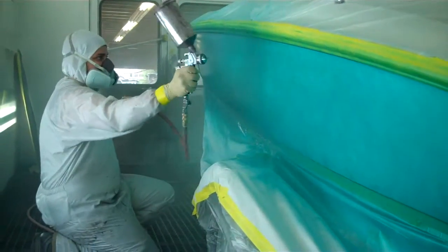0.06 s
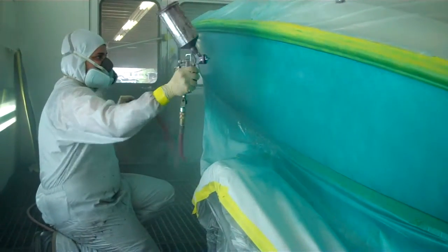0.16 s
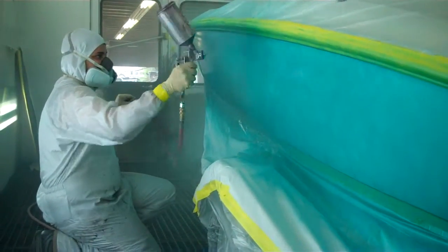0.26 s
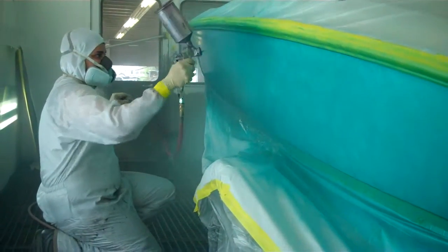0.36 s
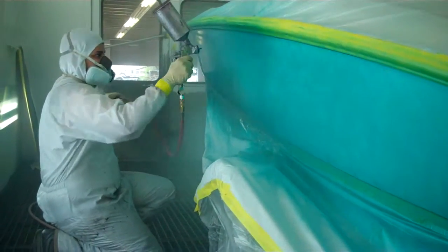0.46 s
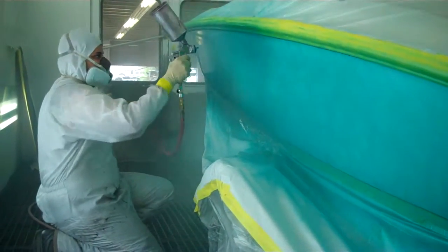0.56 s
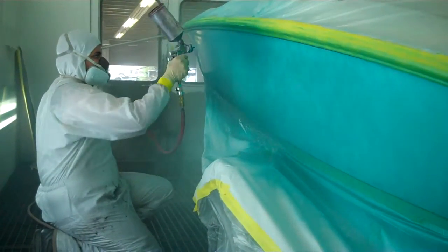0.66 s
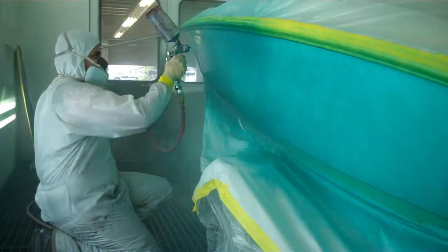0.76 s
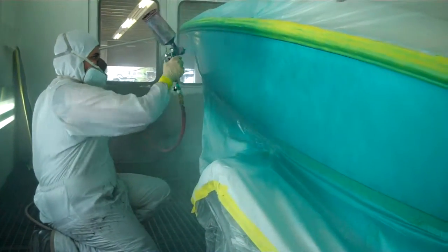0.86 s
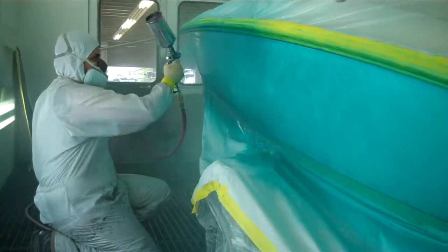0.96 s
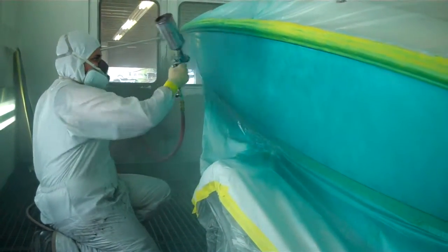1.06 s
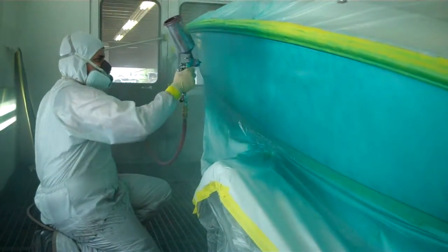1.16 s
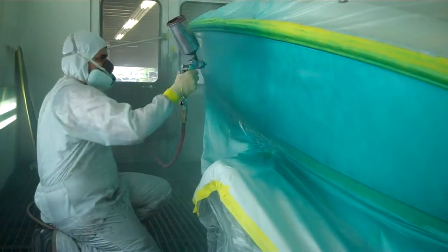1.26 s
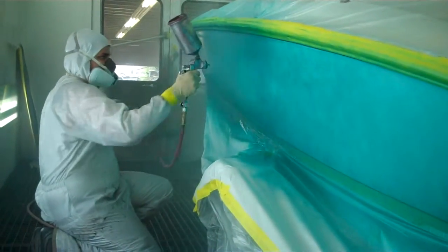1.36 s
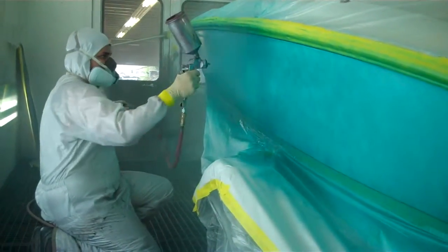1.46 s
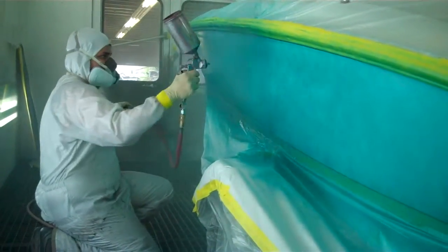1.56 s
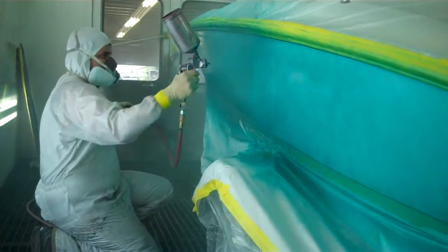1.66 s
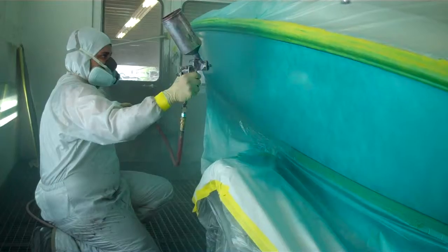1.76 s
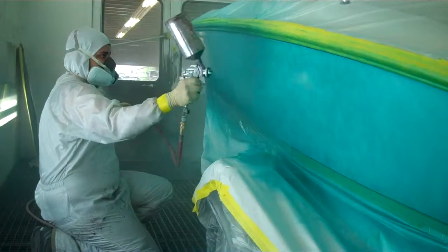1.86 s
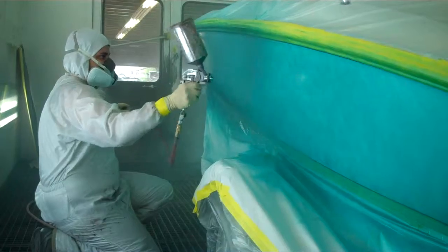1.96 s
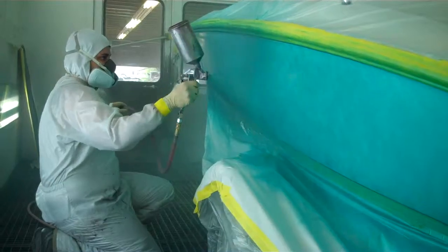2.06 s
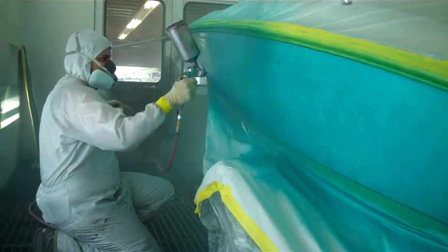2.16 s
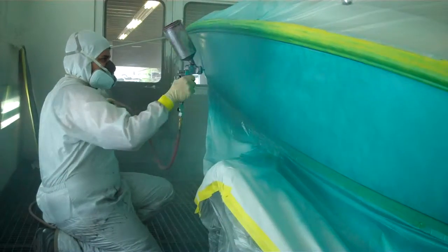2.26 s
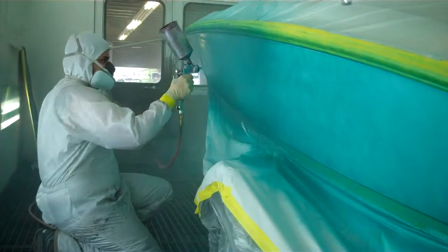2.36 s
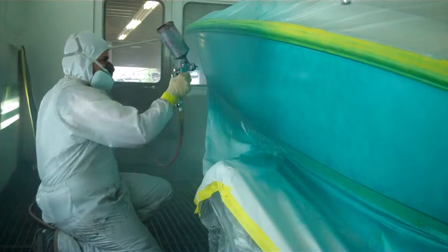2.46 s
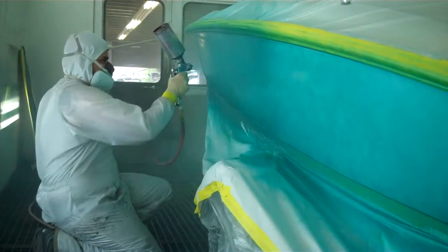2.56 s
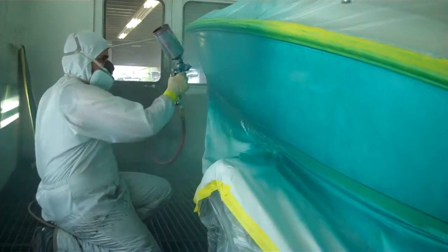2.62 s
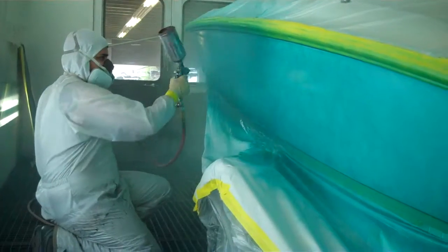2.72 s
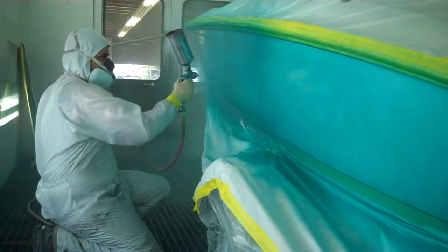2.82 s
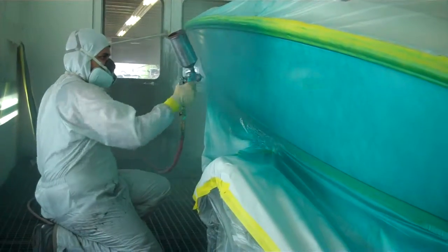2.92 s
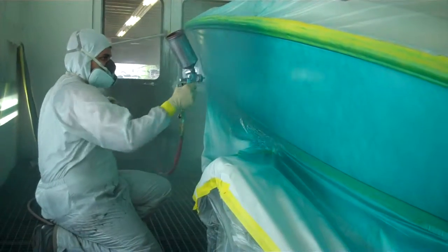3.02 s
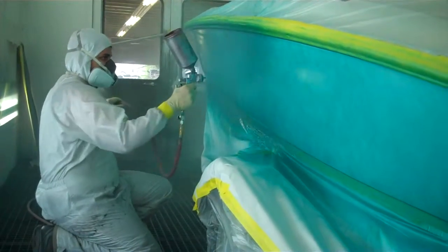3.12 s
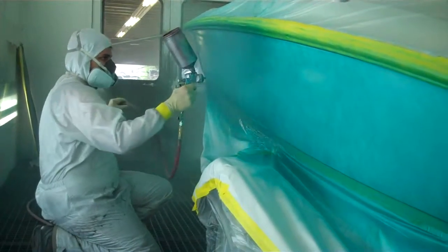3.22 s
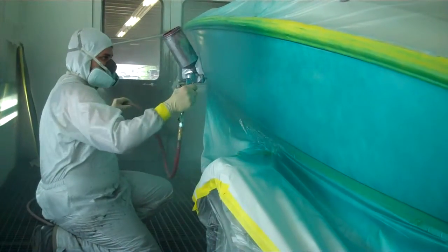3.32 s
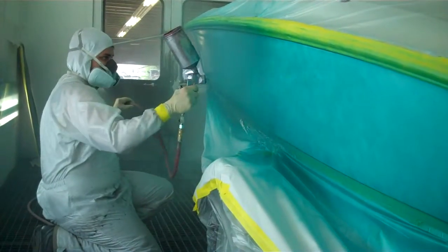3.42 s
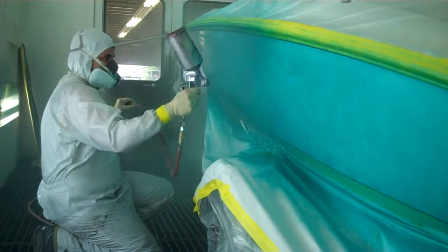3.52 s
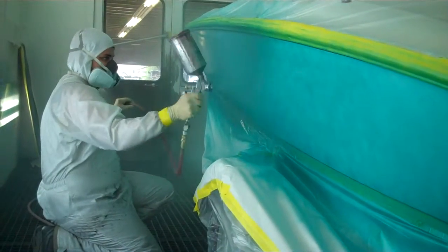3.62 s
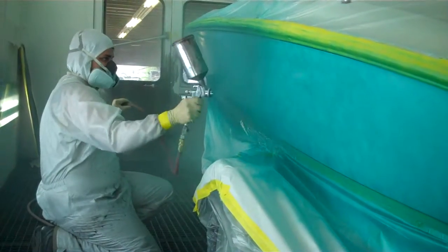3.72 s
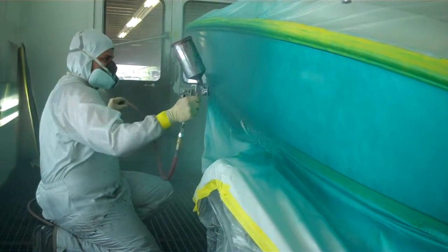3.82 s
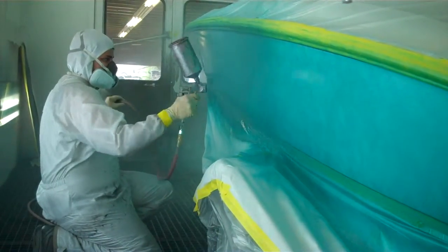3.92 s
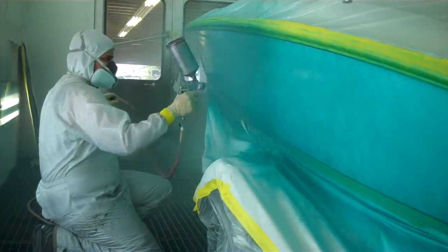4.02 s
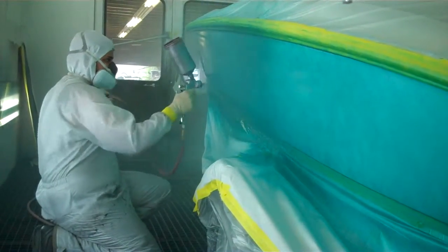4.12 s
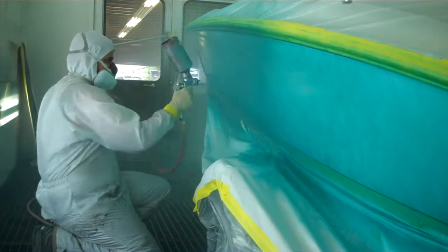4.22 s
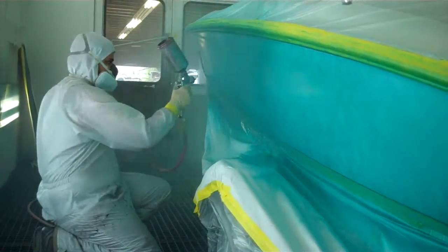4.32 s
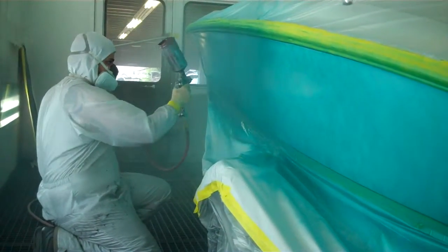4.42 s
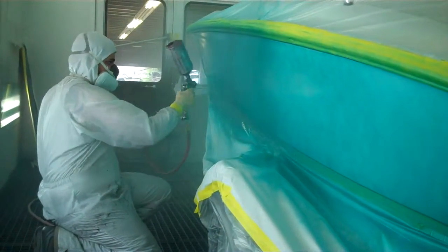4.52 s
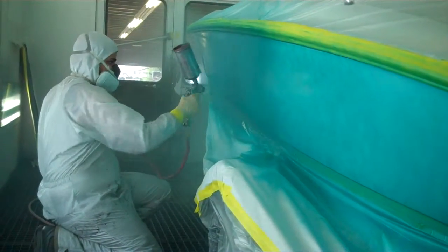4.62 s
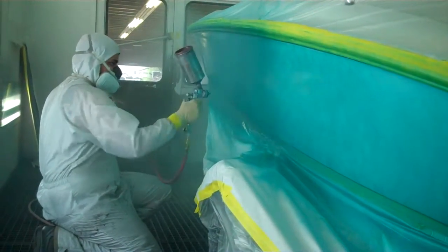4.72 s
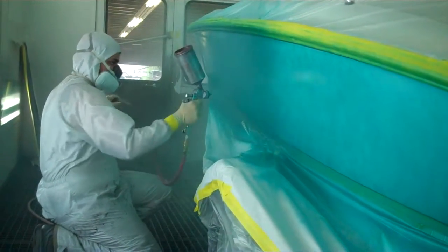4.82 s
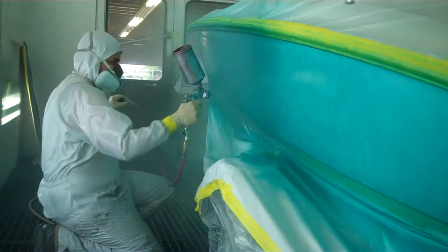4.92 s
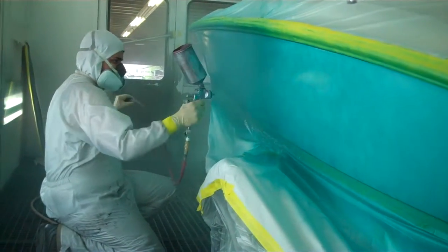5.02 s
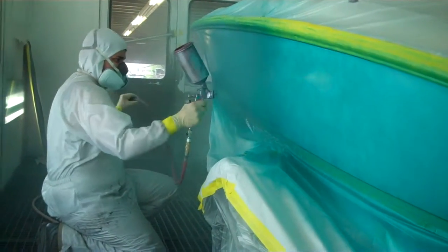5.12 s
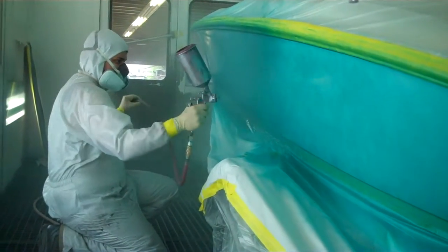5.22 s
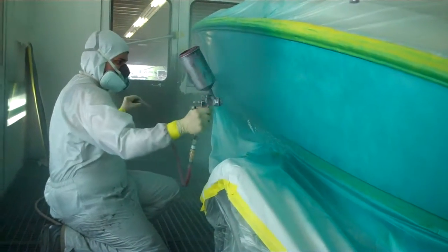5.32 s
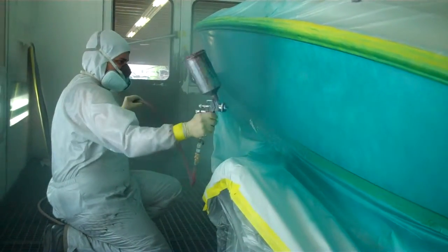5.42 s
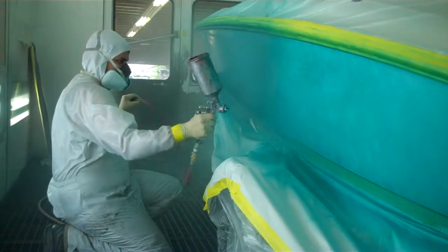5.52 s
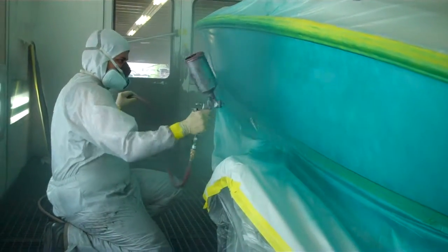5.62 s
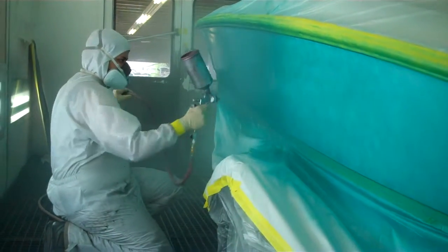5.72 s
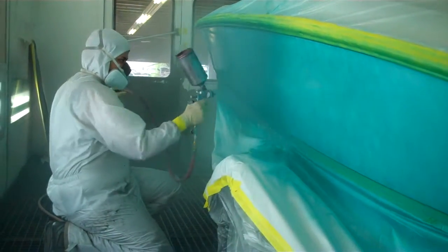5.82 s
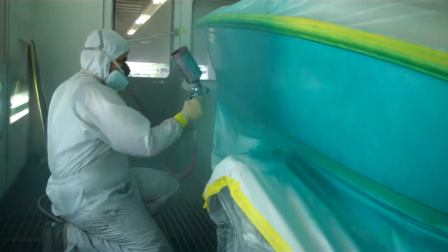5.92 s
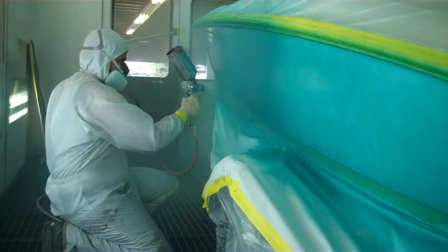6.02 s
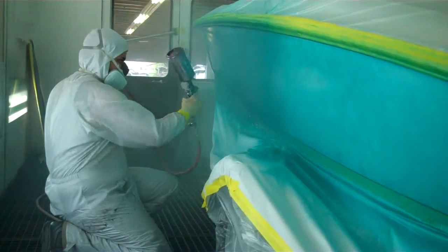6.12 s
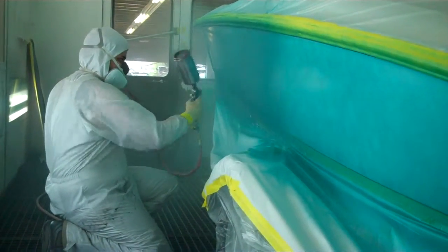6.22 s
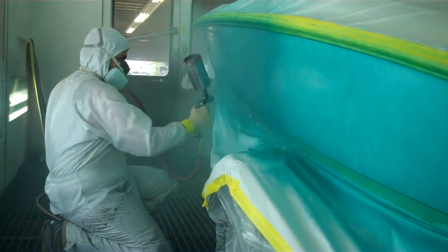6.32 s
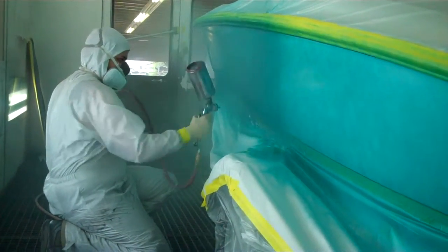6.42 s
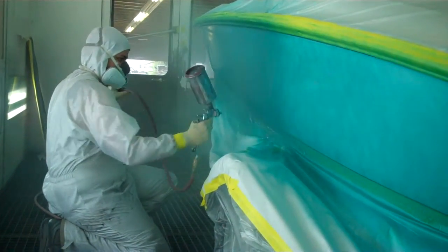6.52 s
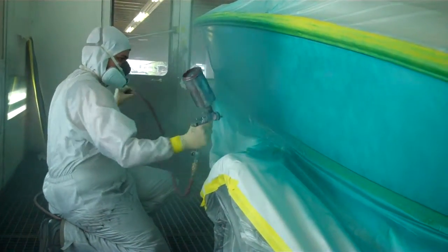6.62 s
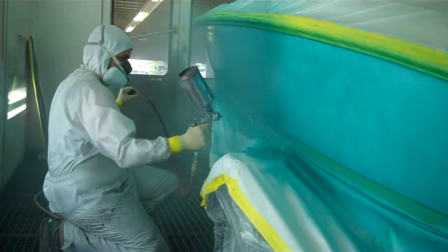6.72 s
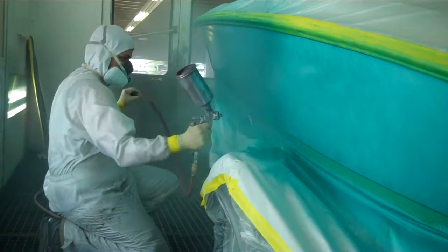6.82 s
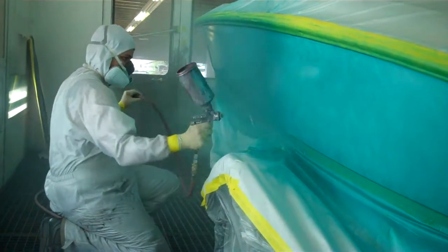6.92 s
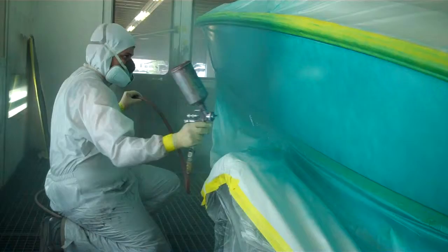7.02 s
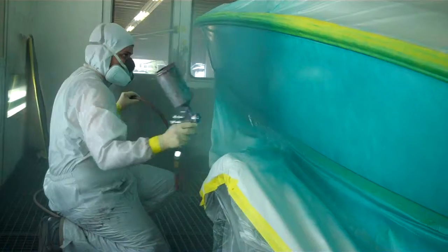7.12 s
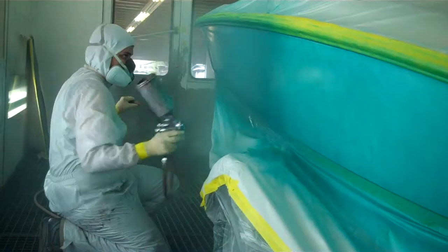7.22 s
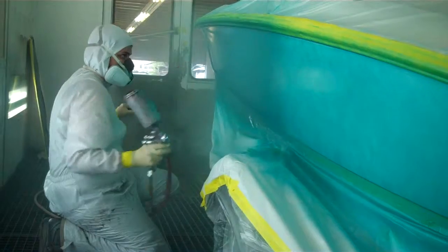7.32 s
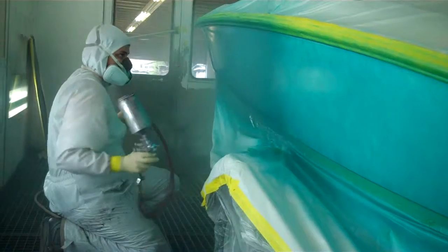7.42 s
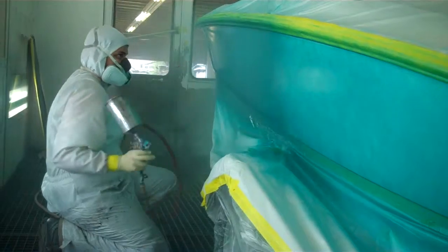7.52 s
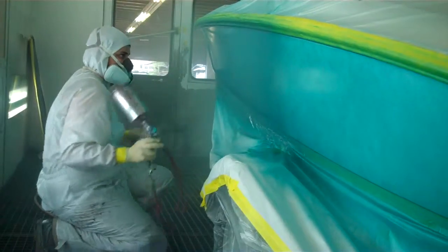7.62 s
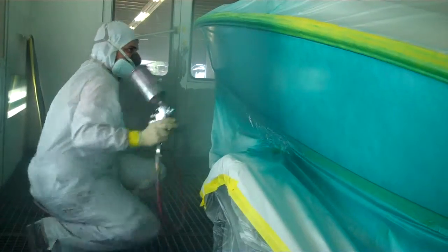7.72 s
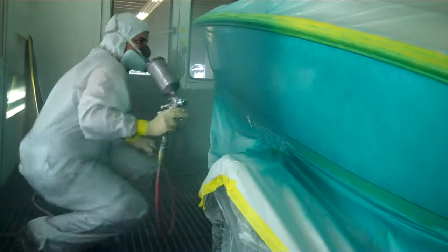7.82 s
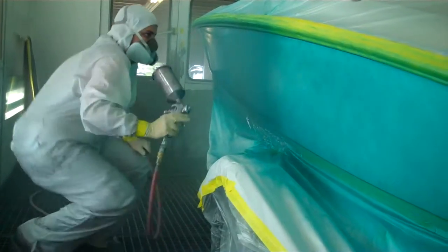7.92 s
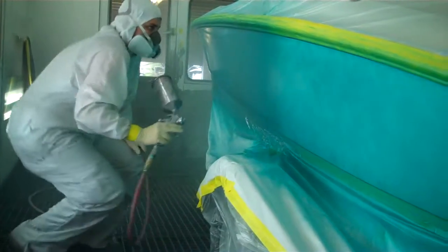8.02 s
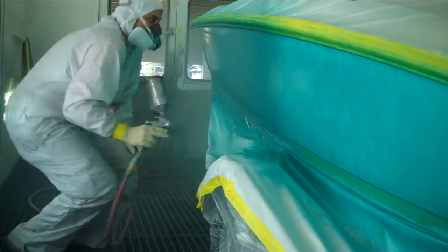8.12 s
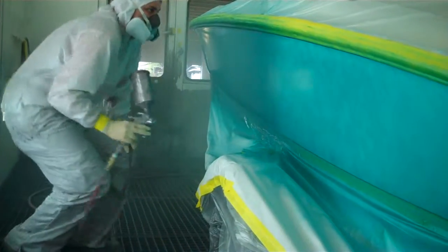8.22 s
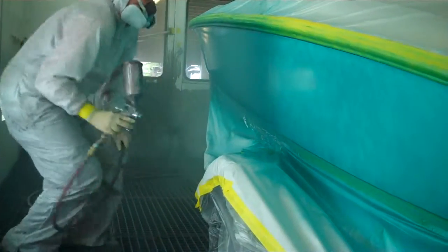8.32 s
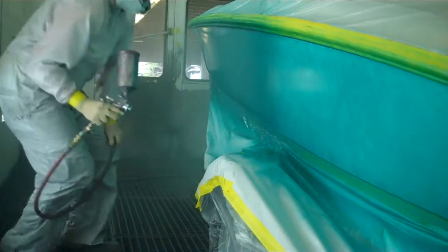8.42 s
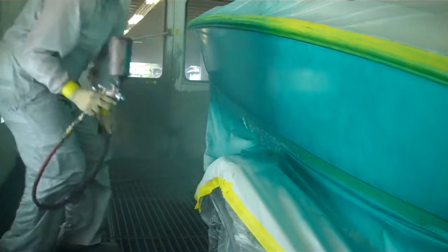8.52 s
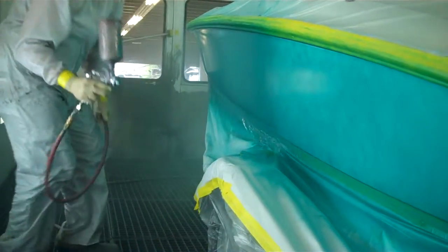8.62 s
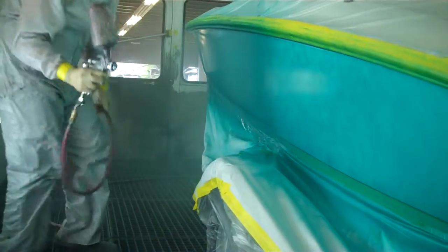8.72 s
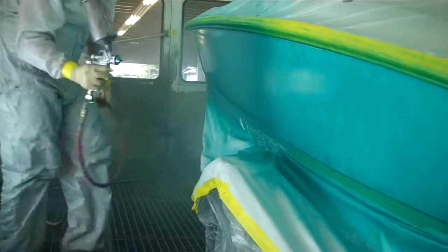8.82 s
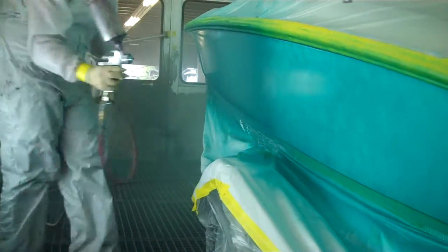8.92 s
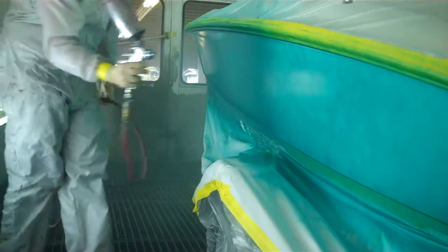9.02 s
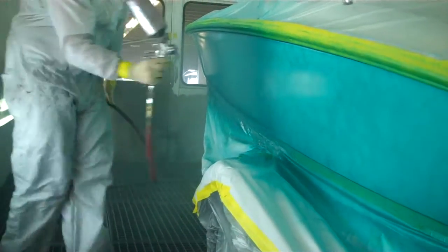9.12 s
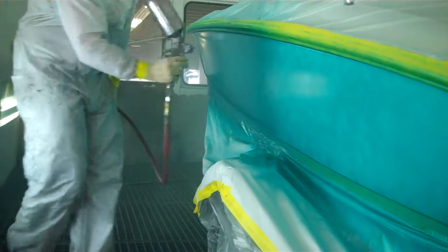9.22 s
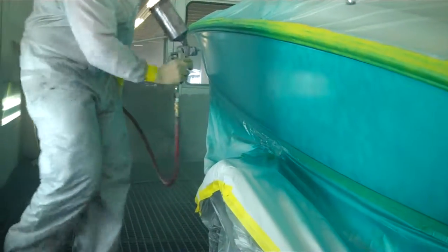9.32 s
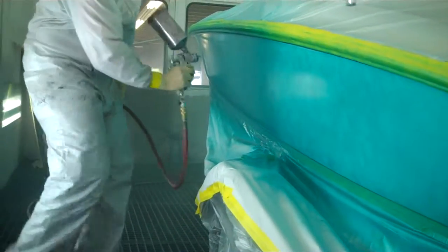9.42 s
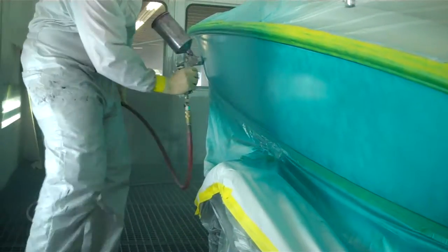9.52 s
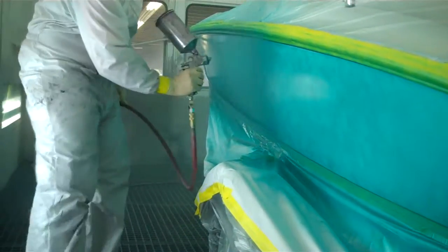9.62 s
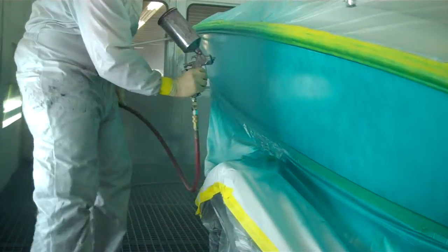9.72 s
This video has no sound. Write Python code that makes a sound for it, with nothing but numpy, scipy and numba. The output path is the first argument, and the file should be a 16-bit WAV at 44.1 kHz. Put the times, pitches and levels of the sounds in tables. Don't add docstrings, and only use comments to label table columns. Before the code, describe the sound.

A compressed-air spray gun hisses loudly in a humming booth, spits off, leaves a faint leak and rhythmic wheeze, then bursts back with crackles.

```python
import sys
import numpy as np
from scipy import signal
from scipy.fft import rfft, irfft
from scipy.io import wavfile
from scipy.ndimage import uniform_filter1d, map_coordinates
from numba import njit

SR = 44100
rng = np.random.default_rng(int(sys.argv[2]) if len(sys.argv) > 2 else 0)


def wav_record(signal):
    frames = np.transpose(np.atleast_2d(signal))
    bounded = np.clip(frames, -1, 1)
    quanta = np.round(bounded * 32767).astype(np.int16)
    wavfile.write(sys.argv[1], SR, quanta)


def makeup_ratio(level_db):
    decades = np.asarray(level_db, float) / 20
    return 10 ** decades


N = 430416
T = np.arange(N) / SR
F = np.fft.rfftfreq(N, 1 / SR) + 1

# sheet lobe, core lobe, body, top [f/Hz]
JET_BANDS_HZ = [5800, 7900, 2900, 13000]
# [f/Hz, density/dB per Hz, port likeness 0-1]
JET_COLOUR = [(250, -87, .9), (587, -73.5, 0.8), (870, -74, 0.86), (1640, -68.5, 0.72), (2440, -67.5, 0.74),
              (3380, -66, 0.38), (5700, -62.5, 0.48), (9050, -61, 0.6), (14500, -59.5, .1)]
# [t/s, nearness level/dB, sheet level/dB, core level/dB]
STROKES = [(0.0, 0.1, 1, 0.5), (0.25, -0.4, 1, 2), (0.62, -2.2, 0.5, -0.4), (0.95, 0, -0.5, -1.9),
           (1.38, 1.8, 1.5, -0.5), (1.78, -0.7, 1, 1), (2.3, -2, 0.5, 0.0), (2.62, -1, 3.5, 0.7),
           (2.86, 0.9, 0.1, -2), (3.0, 3, 2.0, -3), (3.5, 1, 0.7, 0.5), (4.05, -1.6, 2, 0),
           (4.4, 0, 1.5, -2.3), (4.9, 1.7, 2, -2.5), (5.45, 0.5, 0, 0.3), (5.85, -3, 4, 0.3),
           (6.4, 1.9, -0.5, -3), (7.17, 0.4, 0.5, 1.2)]
# [t/s, nearness level/dB, sheet level/dB, core level/dB]
RESUMED = [
    (8.88, -6.5, 2, 3),
    (8.99, -6, 2, 2.5),
    (9.15, -5.5, 2, 3.5),
    (9.25, -8, 1, 3.5),
    (9.38, -6.5, 5.5, 4),
    (9.42, -5, 2, 6),
    (9.62, -5, 2, 1.5),
    (9.76, -0.5, 1.5, -2),
]
# [t/s, detour/ms, share of direct sound]
HULL = [(0, 0.3, 0.046), (.45, .28, 0.11), (.9, 0.22, 0.053), (1.4, 0.15, 0.2), (1.9, 0.29, 0.11),
        (2.2, 0.29, 0.095), (2.6, 0.19, 0.13), (3.1, 0.21, 0.081), (3.9, .3, 0.25), (4.3, 0.2, 0.18),
        (4.9, 0.15, 0.15), (5.5, 0.3, 0.23), (5.9, 0.22, 0.043), (6.4, 0.1, 0.053), (7.15, 0.32, 0.15),
        (8.9, 0.11, 0.043), (9.3, 0.094, 0.046), (9.76, 0.12, 0.052)]
# [t/s, level/dB]
LEAK = [
    (7.3, -55.5),
    (7.55, -42),
    (7.69, -43.5),
    (7.714, -40),
    (7.74, -43),
    (7.89, -40.5),
    (8.55, -44),
    (8.67, -38),
    (8.79, -44),
]
# [f/Hz, level/dB, port likeness 0-1]
LEAK_COLOUR = [(2500, -31, 0.31), (3840, -2.5, .2), (4700, 2, 0.22), (8000, -7, .1), (9800, -10, 0),
               (14300, -14, 0)]
# [t/s, peak level/dB]
CRACKLE = [(7.2058, -6), (7.2142, -4), (7.2165, -5), (7.2229, -8), (8.8385, -2), (8.8421, -1), (8.846, -3),
           (8.8592, -12), (8.8645, -7), (8.8656, -8), (8.8797, -8), (8.9274, -12), (8.9801, -15),
           (8.9863, -13), (8.9917, -14), (9.0164, -12), (9.0234, -15), (9.0357, -14), (9.0387, -9),
           (9.0401, -14), (9.1077, -11), (9.155, -17), (9.1774, -16), (9.1816, -16), (9.183, -12),
           (9.196, -17), (9.197, -7), (9.2089, -13), (9.2349, -9), (9.2668, -13)]
# [start t/s, end t/s, level/dB]
SWARMS = [
    (7.202, 7.224, -16),
    (8.835, 8.858, -6.5),
    (8.872, 8.89, -30),
    (8.975, 9.083, -38),
    (9.097, 9.244, -37),
    (8.89, 9.76, -38),
]
# [share of turn, wheeze f/Hz, wheeze level/dB, whistle level/dB]
BELT = [
    (0, 1960, -38.5, -55),
    (.2, 2300, -39, -53),
    (.35, 2900, -40, -56),
    (.55, 2750, -43, -49),
    (.7, 2620, -42.5, -45.5),
    (.85, 2300, -40.5, -50),
    (1, 1960, -41, -53),
]
# [f/Hz, width/Hz, rms level/dB]
DUCT = [(25.2, 2, -64), (45.1, 2.8, -59.5), (87, 8.9, -45.5), (113.5, 8.1, -54), (241.4, 10.7, -44.5),
        (367.6, 16, -48), (548, 10, -55.5), (1046, 20, -57.5)]
# [f/Hz, density/dB per Hz, port likeness 0-1]
AIR = [(32, -87, .9), (58, -70.5, 0.93), (130, -67, .96), (191, -62, 1), (307, -57.5, 0.98), (415, -64, 1),
       (452, -72.5, 0.83), (514, -64.5, 0.97), (603, -72.5, 1), (663, -68, 1), (916, -79, 0.87),
       (1120, -75, 0.92), (1480, -82.5, 0.9), (2630, -76.5, 0.6)]
# [t/s, level/dB]
DRAUGHT = [(0, 2.5), (.7, 0), (1.5, -0.5), (2.4, -0.5), (2.95, -3), (3.3, 4), (3.95, -6.5), (4.45, 3),
           (5.2, -1), (6.5, -1.5), (6.95, -2), (7.18, -5.5), (7.4, 5), (7.65, -6.5), (7.9, 3), (8.35, -1),
           (8.6, 0.5), (9.76, -4)]
# [f/Hz, share of gain change]
GAIN_SHARE = [(80, 0.11), (280, 0.36), (900, 1.11)]
# [f/Hz, left level/dB, right level/dB]
PORTS = [(30, 2, 7.5), (100, -1.5, -1.3), (287, -1.5, 0.5), (1490, -0.5, 0), (3450, 0, 0), (4630, 2.5, 4),
         (5550, 3.5, 8), (6360, 4, 11), (7160, 8.5, 4.5), (7960, 13.5, 3), (8930, 7.5, -7.5),
         (9960, 1.5, -6), (11500, -1.5, -22), (13800, -3, -95)]

SHEET_DB, CORE_DB, TOP_DB, TOP_RESUMED_DB = -1, 0.5, -0.5, 4.5
BURST_LOW_DB, BURST_TOP_DB = 0.5, 4.5
WALL_ECHO_MS, WALL_ECHO_DB = 1.8, -20
RELEASE_S, SHUT_S, TAIL_DB, TAIL_S = 7.222, 0.0032, -12.5, 0.067
SPIT_S, SPIT_DB, SPIT_LENGTH_S = 7.216, 1, 0.0052
CRACKED_S, CRACKED_DB, PULL_S = 8.767, -11.5, 8.79
SURGE_S, SURGE_DB = .012, 5.5
BURST_S, BURST_DB, SETTLE_S = 8.836, 8, 0.023
SNAP_MS, SAG_MS, SAG = .075, 0.72, 0.17
POP_S, POP_DB, POP_MS = 8.83665, 1.5, .6
BELT_START_S, BELT_TURN_S, WHISTLE_HZ = 7.77, .313, 2257
BLADE_HZ, BLADE_DB, BLADE_WASH_DB, BLADE_WASH_HZ = 273.42, -34.5, -40, 15.5
BLADE_GAIN_SHARE, BLADE_DUCK_SHARE = 0.37, 0.35
DIP_DB, CLIMB_DB_PER_S, CEILING_DB = -7.5, 46, 8
DUCK_DB, CREEP_DB_PER_S, DUCK_S = -20.5, 18, .05
TOP_HZ = 14215


def gun():
    at_s, *aim = np.vstack([STROKES, (BURST_S, 0, 0, 0), RESUMED]).T
    near_db, sheet_db, core_db = (np.interp(T, at_s, column) for column in aim)
    settled_s = BURST_S + SETTLE_S
    burst = np.interp(T, [PULL_S, BURST_S, settled_s, RESUMED[0][0]], [-1, 1, 1, 0])
    burst = burst * (T > CRACKED_S - .01)
    spit_db = SPIT_DB * np.exp(-.5 * ((T - SPIT_S) / SPIT_LENGTH_S) ** 2)
    body_db = spit_db + BURST_LOW_DB * burst
    top_db = TOP_DB + BURST_TOP_DB * burst + TOP_RESUMED_DB * (T > settled_s)
    band_levels_db = [SHEET_DB + sheet_db, CORE_DB + core_db, body_db, top_db]
    level_db = near_db + trigger_db()
    flutter_db = 0.46 * walk(9)
    jet = 0
    for band, band_db in zip(bands(field(JET_COLOUR, 0.95), JET_BANDS_HZ), band_levels_db):
        jet = jet + band * makeup_ratio(level_db + band_db + flutter_db + 0.61 * walk(14))
    at_s, detour_ms, share = np.transpose(HULL)
    detour_ms = uniform_filter1d(np.interp(T, at_s, detour_ms), size=6000)
    share = 0.86 * np.interp(T, at_s, share)
    hull = share * echo(jet, detour_ms)
    hull = hull + 0.25 * share * echo(jet, 2 * detour_ms)
    wall = makeup_ratio(WALL_ECHO_DB) * echo(jet, WALL_ECHO_MS + 0.213 * walk(2))
    return jet + hull + wall


def trigger_db():
    off_s = np.maximum(T - RELEASE_S, 0)
    tail = makeup_ratio(TAIL_DB)
    flow = (1 - tail) * np.exp(-off_s / SHUT_S) + tail * np.exp(-off_s / TAIL_S)
    shut_db = 20 * np.log10(flow + 1e-3)
    pull_s = [CRACKED_S, PULL_S, BURST_S - SURGE_S, BURST_S, BURST_S + SETTLE_S]
    pull_db = [CRACKED_DB, CRACKED_DB + 1.5, BURST_DB - SURGE_DB, BURST_DB, 0]
    db = np.where(T < CRACKED_S, shut_db, np.interp(T, pull_s, pull_db))
    return uniform_filter1d(db, size=300)


def echo(x, ms):
    place = np.arange(N) - ms * SR / 1000
    return np.array([map_coordinates(channel, [place], order=3) for channel in x])


def crackle():
    at_s, peak_db = np.transpose(CRACKLE)
    hits, chance = np.zeros(N), rng.random((2, N))
    for start_s, end_s, swarm_db in SWARMS:
        struck = (T > start_s) * (T < end_s) * (chance[0] < 900 / SR)
        hits += struck * makeup_ratio(swarm_db) * np.minimum(-np.log(chance[1]), 2.5)
    hits[(at_s * SR).astype(int)] += makeup_ratio(peak_db)
    ms = np.arange(-20, 300) * 1000 / SR
    sag = SAG * (ms > 0) * (1 - np.exp(-ms / 0.029)) * np.exp(-ms / SAG_MS)
    snap = np.exp(-.5 * (ms / SNAP_MS) ** 2) - sag
    snaps = np.convolve(hits, snap)[20:20 + N]
    after_ms = np.maximum(T - POP_S, 0) * 1000
    snaps -= makeup_ratio(POP_DB) * (1 - np.exp(-after_ms / 0.11)) * np.exp(-after_ms / POP_MS)
    return snaps * makeup_ratio(np.array([[-26], [0]]))


def leak():
    at_s, db = np.transpose(LEAK)
    patches = bands(field(LEAK_COLOUR, 3.0), [3500, 4500, 5550, 7000, 9200, 12000])
    hiss = sum(patch * makeup_ratio(0.82 * walk(9.2) + 2.0 * walk(25)) for patch in patches)
    return hiss * makeup_ratio(np.interp(T, at_s, db, -120, -120) - 35.5)


def belt():
    turn = ((T - BELT_START_S) / BELT_TURN_S) % 1
    share, *columns = np.transpose(BELT)
    hz, wheeze_db, whistle_db = (np.interp(turn, share, column) for column in columns)
    wheeze = np.array([ring(hz + 90 * walk(25), 580) for _ in range(2)])
    wheeze = wheeze * makeup_ratio(wheeze_db - 6.0 + 1.0 * walk(12))
    whistle = ring(WHISTLE_HZ + 25 * walk(8), 54) * makeup_ratio(whistle_db + 0.5)
    return wheeze + whistle * makeup_ratio(np.array([[1.5], [-1.5]]))


def blades():
    tone = makeup_ratio(BLADE_DB) * np.sqrt(2) * np.sin(2 * np.pi * BLADE_HZ * T)
    wash = makeup_ratio(BLADE_WASH_DB) * ring(BLADE_HZ, BLADE_WASH_HZ)
    draught_db = np.interp(T, *np.transpose(DRAUGHT))
    gain_share = np.where(T < BURST_S, BLADE_GAIN_SHARE, BLADE_DUCK_SHARE)
    return (tone + wash) * makeup_ratio(draught_db + gain_db() * gain_share)


def booth():
    air = irfft(field(AIR, 3.1) / (1 + (F / 3200) ** 8), N)
    for hz, width_hz, db in DUCT:
        level = makeup_ratio(db + 2.0 * walk(3.03))
        common = ring(hz, width_hz)
        opposed = 0.14 * ring(hz, width_hz) * np.array([[1], [-1]])
        air = air + level * (common + opposed)
    air = air + belt()
    centres_hz, shares = np.transpose(GAIN_SHARE)
    parts = zip(bands(rfft(air), centres_hz), shares)
    return sum(band * makeup_ratio(share * gain_db() + 1.06 * walk(5)) for band, share in parts)


def gain_db():
    pause_db = np.minimum(DIP_DB + CLIMB_DB_PER_S * (T - RELEASE_S), CEILING_DB)
    ducked_db = DUCK_DB + CREEP_DB_PER_S * (T - BURST_S)
    db = np.where(T < RELEASE_S, 0, np.where(T < BURST_S, pause_db, ducked_db))
    return uniform_filter1d(db, size=int(DUCK_S * SR))


def on_log(table, col):
    table = np.array(table, float)
    return np.interp(np.log(F), np.log(table[:, 0]), table[:, col])


def unit(x):
    return x / np.sqrt(np.mean(x ** 2))


def walk(rate_hz):
    hold = int(SR / rate_hz)
    steps = np.repeat(rng.standard_normal(N // hold + 1), hold)
    return unit(uniform_filter1d(uniform_filter1d(steps, hold), hold)[:N])


def field(colour, lag):
    like = np.clip(on_log(colour, col=2), 0, 1)
    noise = rfft(rng.standard_normal((2, N)))
    mid, side = noise * makeup_ratio(on_log(colour, col=1)) * np.sqrt(SR / 4)
    mid, side = mid * np.sqrt(1 + like), side * np.sqrt(1 - like)
    return np.array([(mid + side) * np.exp(-2j * np.pi * F * lag / SR), mid - side])


def bands(spectrum, centres_hz):
    order = np.argsort(centres_hz)
    log_centres = np.log(np.sort(centres_hz))
    hats = [np.interp(np.log(F), log_centres, 1. * (order == k)) for k in range(len(order))]
    return [irfft(spectrum * hat, N) for hat in hats]


@njit
def svf(x, hz, width_hz):
    y, band, low = np.empty(len(x)), 0., 0.
    for i in range(len(x)):
        g, damping = np.tan(np.pi * hz[i] / SR), width_hz / hz[i]
        v = (band + g * (x[i] - low)) / (1 + g * (g + damping))
        band, low, y[i] = 2 * v - band, low + 2 * g * v, damping * v
    return y


def ring(hz, width_hz):
    hz, width_hz = hz + np.zeros(N), 1. * width_hz
    return unit(svf(svf(rng.standard_normal(N), hz, width_hz), hz, width_hz))


def scene():
    air = gun() + leak() + booth() + blades()
    ports = makeup_ratio(np.array([on_log(PORTS, col=1), on_log(PORTS, col=2)]))
    return irfft(rfft(air) * ports, N) + crackle()


def top_cut(x):
    return signal.sosfilt(signal.butter(12, 14860, fs=SR, output="sos"), x)


def record(dry):
    clipped = rfft(np.clip(dry, -.86, .86))
    mix = irfft(clipped / (1 + (F / TOP_HZ) ** 600) / (1 + (20 / F) ** 4), N)
    return top_cut(mix)


dry = scene()
out = record(dry)
wav_record(out)
```